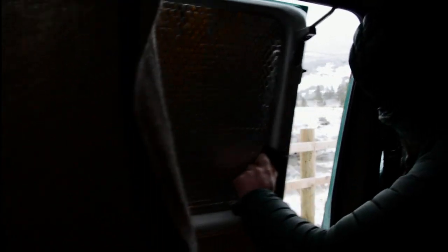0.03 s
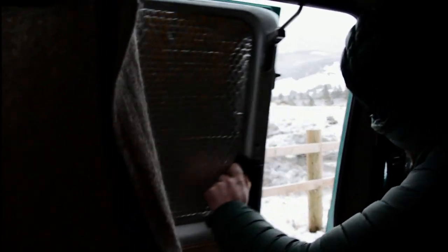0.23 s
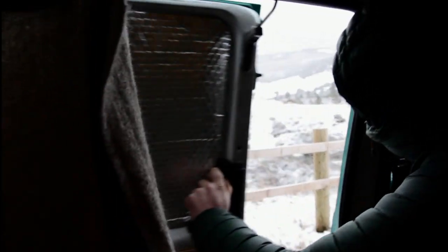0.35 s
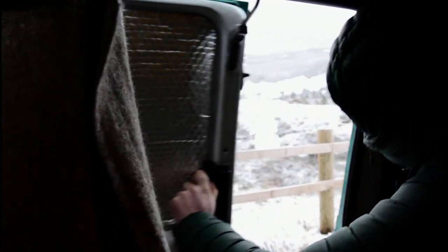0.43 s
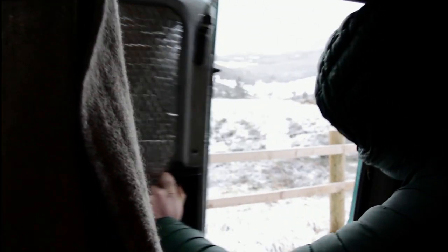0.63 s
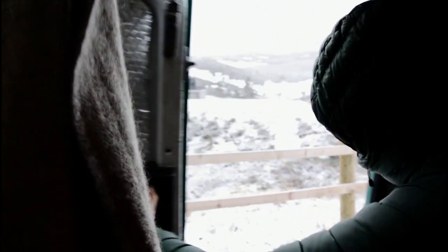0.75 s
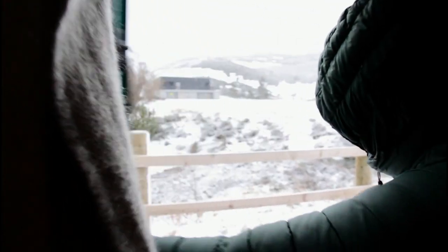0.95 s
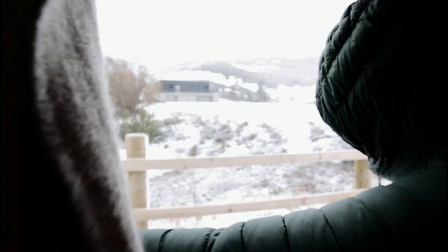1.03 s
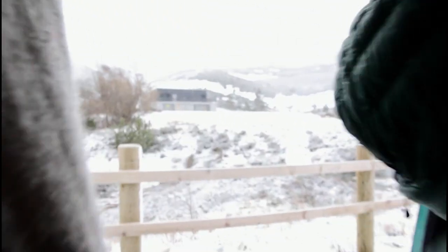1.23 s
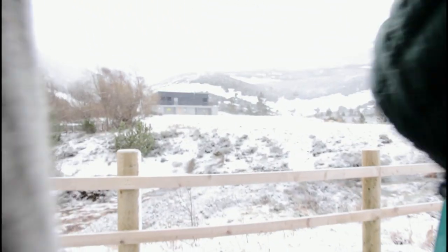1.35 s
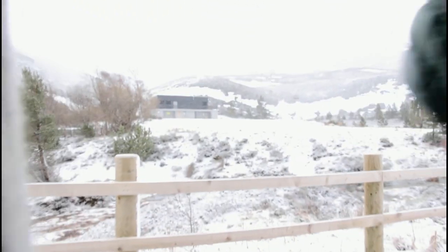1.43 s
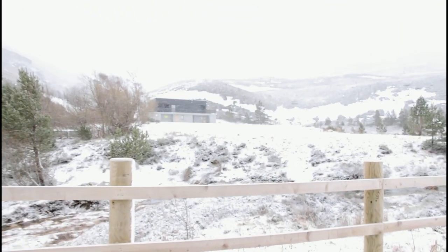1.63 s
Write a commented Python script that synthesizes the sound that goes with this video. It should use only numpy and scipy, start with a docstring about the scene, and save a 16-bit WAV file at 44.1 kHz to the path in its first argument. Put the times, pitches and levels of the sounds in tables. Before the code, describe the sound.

A van's sliding door rolls open with a building rumble, gritty scraping and small rattles, then clacks into its end catch and knocks back once. It is heard from inside the cabin, with faint outdoor air afterwards.

```python
"""A van's sliding side door is pushed open, heard from inside the cabin in quiet country.
First the rollers gather speed on a gritty track: they rumble, scrape and ring the door panel, while the
cabin air booms and loose fittings tick and knock. Midway the steel rail sings and a roller squeals.
At about 1.25 s the door clacks into its end catch; it knocks back once and settles.
Last, with the doorway clear, the faint sound of the open air comes up."""
import sys
import numpy as np
from scipy import signal
from scipy.fft import rfft, irfft
from scipy.io import wavfile
from scipy.ndimage import uniform_filter1d

SR = 44100
rng = np.random.default_rng(int(sys.argv[2]) if len(sys.argv) > 2 else 0)


def generate_wav(sig):
    """Save sig (samples, or channels by samples) to the path in sys.argv[1] as 16-bit PCM at SR."""
    pcm = np.round(np.clip(np.atleast_2d(sig).T, -1, 1) * 32767).astype(np.int16)
    wavfile.write(sys.argv[1], SR, pcm)


N = 74970
T = np.arange(N) / SR

# Levels in spectra, resonances and modes are relative within each table.
# envelope of the open air (t/s, level/dB) and its spectrum (f/Hz, level/dB)
AIR_ENVELOPE = [(0, -53), (1.6, -52), (1.69, -46)]
AIR_SPECTRUM = [(15, -35), (25, 16.5), (86, -9), (582, -23), (1240, -7), (1660, -4.5), (1900, -9),
                (2230, -9.5), (3530, -13.5), (4150, -14.5), (15500, -31)]
# envelopes of the cabin boom and of the body's deep sway (t/s, level/dB)
BOOM_ENVELOPE = [(0, -52), (.1, -49.5), (.22, -34), (.29, -42), (.36, -34), (.47, -39.5), (.57, -28),
                 (.7, -34.5), (.9, -41), (1.05, -40), (1.3, -42.5), (1.47, -42), (1.68, -70)]
SWAY_ENVELOPE = [(0, -48.5), (.18, -40.5), (.26, -37), (.42, -39), (.9, -46), (1.2, -40), (1.55, -40.5),
                 (1.7, -49.5)]
# resonances of cabin air, body, steel rail and door panel (f/Hz, nominal width/Hz, level/dB)
CABIN_RESONANCES = [(102, 8, 0), (117, 9, -5)]
BODY_RESONANCES = [(27.6, 14, 4.5), (52.8, 10.4, 2.5), (64, 45, -6.5)]
RAIL_RESONANCES = [(1620, 87, 3), (1724, 50, -2), (9800, 1300, -22.5)]
PANEL_RESONANCES = [(205, 10, 0), (260, 12, 3), (350, 22, 0), (390, 22, 0), (452, 22, -8), (583, 16, -7),
                    (625, 16, -8), (1030, 50, -19)]
# thin squeals of a roller and drones of the panel (t/s, duration/s, f/Hz, peak level/dB)
ROLLER_SQUEALS = [(.69, 0.05, 9300, -58), (.735, 0.023, 9500, -52), (.79, 0.033, 9350, -55)]
PANEL_DRONES = [(.2, 0.031, 560, -29), (.49, 0.14, 614, -32.5), (.59, 0.065, 262, -27),
                (.79, 0.044, 258, -26.5), (.96, 0.13, 641, -27.5), (.98, .13, 360, -26.5),
                (1.08, 0.095, 582, -29), (1.1, 0.14, 366, -34), (1.17, 0.26, 205, -33.5)]
# ticks of loose fittings, and dull knocks of the door in its guides plus, at 1.251 s, the body of the blow on
# the end catch (t/s, peak level/dB, centre f/Hz, T60/s)
FITTING_TICKS = [(.146, -28.5, 4900, 0.023), (0.25, -31.5, 4270, 0.054), (0.309, -32, 3680, 0.088),
                 (0.381, -31.5, 3900, 0.016), (0.406, -20, 3380, 0.012), (0.4093, -27, 7300, 0.015),
                 (0.4151, -24, 3350, 0.028), (0.516, -35, 6400, 0.0072), (0.563, -35.5, 8950, 0.0086),
                 (0.681, -28, 6260, 0.039), (.744, -39.5, 8440, 0.04), (0.858, -26.5, 3870, 0.016),
                 (.880, -19.5, 4200, 0.007), (0.9175, -25.5, 4200, 0.011), (0.953, -29, 6170, 0.011),
                 (.997, -29.5, 5860, 0.033), (1.034, -31, 4700, 0.061), (1.058, -30, 4560, .02),
                 (1.074, -25, 4140, 0.015), (1.106, -19.5, 3030, 0.047), (1.139, -36, 5730, 0.015),
                 (1.178, -36, 7060, 0.014), (1.199, -25, 3700, 0.032), (1.209, -29, 4680, 0.015),
                 (1.287, -26, 4770, 0.014), (1.395, -31.5, 5340, 0.033), (1.407, -25.5, 4460, 0.024)]
GUIDE_KNOCKS = [(.024, -36.5, 1020, 0.044), (0.204, -20, 456, 0.07), (.315, -23.5, 630, 0.093),
                (.418, -23, 720, 0.052), (.488, -31, 635, 0.043), (0.593, -24, 830, 0.029),
                (.623, -24, 870, 0.043), (1.035, -15.5, 373, 0.032), (1.251, -13, 517, 0.035),
                (1.3784, -14.5, 1480, 0.028), (1.38, -24, 328, 0.088), (1.436, -31, 1590, .1),
                (1.565, -33.5, 810, 0.023)]
# envelopes of the rollers' rumble and of their treble scrape (t/s, relative level/dB)
RUMBLE_ENVELOPE = [(0, -54), (.07, -41.5), (.135, -38.5), (.185, -41), (.215, -30), (.26, -34), (.37, -28),
                   (.47, -31.5), (.56, -29), (.65, -26.5), (.73, -26.5), (.775, -32.5), (.815, -26.5),
                   (.94, -27), (1.04, -23), (1.1, -23.5), (1.23, -22.5), (1.3, -26), (1.42, -36),
                   (1.56, -47), (1.7, -58)]
SCRAPE_ENVELOPE = [(0, -55.5), (.17, -54), (.33, -42.5), (.48, -51), (.58, -38.5), (.69, -40.5),
                   (.78, -42.5), (.97, -42.5), (1.04, -32.5), (1.13, -40), (1.2, -32), (1.235, -38.5),
                   (1.33, -39.5), (1.42, -38.5), (1.445, -43.5), (1.5, -49), (1.62, -59)]
# spectra of the rumble at the start, middle and end of the track, and of the scrape (f/Hz, level/dB)
EARLY_SPECTRUM = [(88, -16), (150, -5), (365, -4.5), (634, -5.5), (785, -18.5), (1010, -14), (1350, -26.5),
                  (1620, -14), (1910, -22.5), (3000, -28.5), (3900, -52), (6600, -120)]
MIDWAY_SPECTRUM = [(88, -44), (150, -6), (264, -4.5), (306, -6), (384, -2.5), (1060, -25.5), (1400, -31),
                   (1620, -19.5), (1890, -28.5), (3000, -31.5), (3900, -56), (6600, -120)]
LATE_SPECTRUM = [(88, -50), (150, -7.5), (200, -6.5), (365, -3.5), (539, -7), (588, -14), (1050, -13),
                 (1280, -25.5), (1540, -17.5), (3000, -48), (3900, -41), (6600, -120)]
SCRAPE_SPECTRUM = [(700, 16.5), (1600, 4.5), (3100, 4), (4700, 3), (6000, -9.5), (7700, -11.5),
                   (10000, -20), (15500, -24.5)]
# blows on the end catch (t/s, peak level/dB, passband centre f/Hz)
CATCH_IMPACTS = [(1.247, -7, 2900), (1.2507, -6, 790), (1.2562, -15, 1190)]
# normal modes of the catch (f/Hz, level/dB, T60/s)
CATCH_MODES = [(480, 2, .1), (620, 2, .06), (795, -1, .07), (942, -3, .13), (1030, -2, .07), (1135, 1, .05),
               (1285, -2, .09), (1825, -4, .07), (2096, -4, .08), (2515, -1, .07), (2604, -1, .07),
               (2822, -3, .06), (3015, -4, .08), (3627, -4, .08), (3740, -5, .06), (5050, -10, .06)]
# spectrum of the crack of each blow (f/Hz, level/dB)
CRACK_SPECTRUM = [(350, -8), (1100, 0), (2000, -6), (2900, 0.5), (4000, -6), (6500, -16.5), (15000, -27)]

BUMPS_PER_S, BUMP_SPREAD_DB, GRIT_PER_S = 2500, 2, 9000
BURST_SAMPLES = SR // 4


def undb(db):
    """Amplitude ratio of a level in decibels."""
    return 10 ** (np.asarray(db) / 20)


def unit(x):
    """Normalisation to rms 1."""
    return x / np.sqrt(np.mean(x ** 2))


def envelope(rows):
    """Amplitude envelope through (t/s, level/dB) points."""
    return undb(np.interp(T, *np.array(rows).T))


def band(x, hz, width_hz):
    """Second-order resonator with gain 1 at its centre."""
    quality = hz / min(width_hz, .3 * SR)
    return signal.lfilter(*signal.iirpeak(min(hz, .45 * SR), quality, fs=SR), x)


def ring(x, resonances):
    """Forced response of parallel resonators, each applied twice for steep skirts; rms 1."""
    return unit(sum(undb(db) * band(band(x, hz, 2 * w), hz, 2 * w) for hz, w, db in resonances))


def colour(x, spectrum):
    """Spectral shaping by (f/Hz, level/dB) points, rolling off beyond them; rms 1."""
    hz, db = np.array(spectrum).T
    log_f = np.log(np.fft.rfftfreq(N, 1 / SR) + 1)
    outside = np.maximum(np.log(hz[0]) - log_f, 0) + np.maximum(log_f - np.log(hz[-1]), 0)
    gain = undb(np.interp(log_f, np.log(hz), db) - 40 * outside)
    return unit(irfft(rfft(x) * gain, N))


def wander(per_s):
    """Smooth random modulation of rms 1."""
    jagged = np.interp(T * per_s, np.arange(400), rng.standard_normal(400))
    return unit(uniform_filter1d(jagged, int(SR / per_s) // 2))


def impacts(per_s, spread_db):
    """Shot noise: a random train of tiny contacts of uneven size."""
    contacts = (rng.random(N) < per_s / SR) * rng.choice([-1, 1], N)
    return contacts * undb(spread_db * np.minimum(rng.exponential(size=N), 5))


def steady(x, span_s):
    """Division by the running rms evens out the swells of a random vibration."""
    return x / np.sqrt(uniform_filter1d(x ** 2, int(span_s * SR)) + 1e-6)


def decay(t60):
    """Exponential damping by 60 dB in t60 seconds."""
    return undb(-60 * T[:BURST_SAMPLES] / t60)


def add(out, at, peak_db, x):
    """Superposition of a transient at a given time and peak level."""
    start = int(at * SR)
    x = x[:N - start]
    out[start:start + len(x)] += x * undb(peak_db) / np.abs(x).max()


def open_air():
    """Ambient noise, which rises once the doorway is clear."""
    return envelope(AIR_ENVELOPE) * colour(rng.standard_normal(N), AIR_SPECTRUM)


def cabin():
    """Cavity and structural resonance: the moving door sets the air booming and the body swaying."""
    boom = steady(ring(rng.standard_normal(N), CABIN_RESONANCES), span_s=0.084)
    sway = steady(ring(rng.standard_normal(N), BODY_RESONANCES), span_s=0.28)
    return boom * envelope(BOOM_ENVELOPE) + sway * envelope(SWAY_ENVELOPE)


def rail():
    """Frictional excitation: rubbing makes the rail sing in fits, most of all in mid-travel."""
    level_db, flicker_db, middle_s, spread_s = -48.5, 2, 0.77, 0.27
    swell = np.exp(-.5 * ((T - middle_s) / spread_s) ** 2)
    gain = undb(level_db + flicker_db * wander(per_s=27))
    return gain * swell * ring(impacts(GRIT_PER_S, BUMP_SPREAD_DB), RAIL_RESONANCES)


def driven_tones(rows, pitch_spread, flutter_db, per_s):
    """Forced vibration: resonances swell and die as the rollers drive them, unsteady in pitch and level."""
    out = np.zeros(N)
    for at, duration, hz, db in rows:
        swell = np.sin(np.pi * np.clip((T - at) / duration, 0, 1))
        phase = 2 * np.pi * np.cumsum(hz * (1 + pitch_spread * wander(per_s))) / SR
        out += swell * undb(db + flutter_db * wander(per_s)) * np.sin(phase)
    return out


def fittings():
    """Impact and reverberation: loose fittings give bright ticks with a short cabin tail."""
    out = np.zeros(N)
    tail = undb(-21) * decay(t60=0.14)
    for at, db, hz, t60 in FITTING_TICKS:
        burst = rng.standard_normal(BURST_SAMPLES) * (decay(t60) + tail)
        tick = band(burst, hz, width_hz=0.22 * hz)
        add(out, at, db, band(tick, hz, width_hz=hz))  # the second band steepens the skirts
    return out


def guides():
    """Damped impact: the door knocks in its guides, each time a dull, broad band of noise; one such knock also
    gives the blow on the end catch its body."""
    out = np.zeros(N)
    for at, db, hz, t60 in GUIDE_KNOCKS:
        burst = band(rng.standard_normal(BURST_SAMPLES) * decay(t60), hz, width_hz=0.78 * hz)
        lowpass = signal.butter(4, 1.35 * hz, fs=SR)
        add(out, at, db, signal.lfilter(*lowpass, burst))
    return out


def rumble():
    """Structure-borne sound: bumps in the track shake the door and ring its panel."""
    bumps = impacts(BUMPS_PER_S, BUMP_SPREAD_DB)
    # three spectra give way to one another along the track
    early = np.interp(T, (.45, .62), [1, 0])
    late = np.interp(T, (.88, 1.02), [0, 1])
    track = (early * colour(bumps, EARLY_SPECTRUM)
             + (1 - early - late) * colour(bumps, MIDWAY_SPECTRUM)
             + late * colour(bumps, LATE_SPECTRUM))
    panel = steady(ring(impacts(BUMPS_PER_S, BUMP_SPREAD_DB), PANEL_RESONANCES), span_s=0.099)
    return undb(-0.52) * steady(track + undb(-1.5) * panel, span_s=0.066) * envelope(RUMBLE_ENVELOPE)


def scrape():
    """Roughness noise: fine grit scrapes under the rollers and coarser grit crackles."""
    gain_db, flicker_db = 0.5, 2.3
    grit = colour(impacts(GRIT_PER_S, spread_db=2.5), SCRAPE_SPECTRUM)
    crackle = undb(-4) * colour(impacts(per_s=350, spread_db=1), SCRAPE_SPECTRUM)
    return undb(gain_db + flicker_db * wander(per_s=74)) * (grit + crackle) * envelope(SCRAPE_ENVELOPE)


def rollers(judder_db=1):
    """Amplitude modulation: rumble and scrape judder together."""
    return (rumble() + scrape()) * undb(judder_db * wander(per_s=55))


def catch():
    """Impulse response: three quick blows each crack and leave the modes of the catch ringing."""
    out = np.zeros(N)
    t = T[:BURST_SAMPLES]
    for at, peak_db, centre_hz in CATCH_IMPACTS:
        modes = sum(undb(db) * decay(t60) * np.sin(2 * np.pi * (hz * t + rng.random()))
                    for hz, db, t60 in CATCH_MODES)
        crack = colour(rng.standard_normal(N), CRACK_SPECTRUM)[:BURST_SAMPLES] * decay(t60=0.046)
        clack = unit(modes) + undb(-1) * unit(crack)
        add(out, at, peak_db, band(clack, centre_hz, width_hz=centre_hz))
    return out


def scene():
    """Superposition of the door's sounds and the faint open air, in one channel."""
    air = open_air()
    door = rollers() + rail() + cabin() + fittings() + guides() + catch()
    drones = driven_tones(PANEL_DRONES, pitch_spread=0.00783, flutter_db=0.5, per_s=35)
    squeals = driven_tones(ROLLER_SQUEALS, pitch_spread=.007, flutter_db=1, per_s=250)
    return (air + door + drones + squeals)[None]


def record(dry):
    """Band limiting: a steep elliptic low-pass cuts the highest treble."""
    cutoff_hz = 15900
    return signal.sosfilt(signal.ellip(10, .2, 80, cutoff_hz, fs=SR, output="sos"), dry)


dry = scene()
out = record(dry)
generate_wav(out)
```